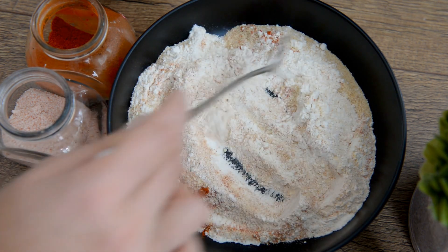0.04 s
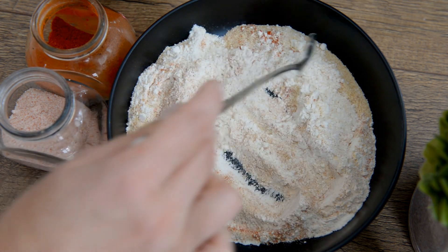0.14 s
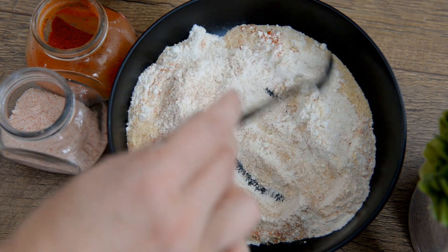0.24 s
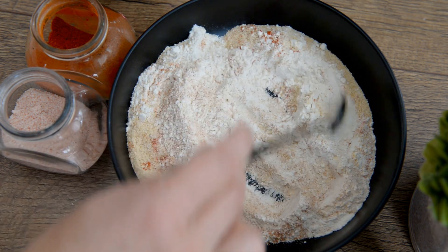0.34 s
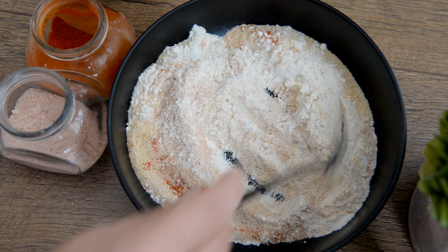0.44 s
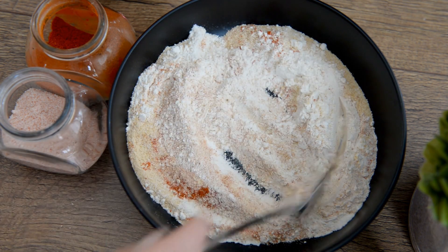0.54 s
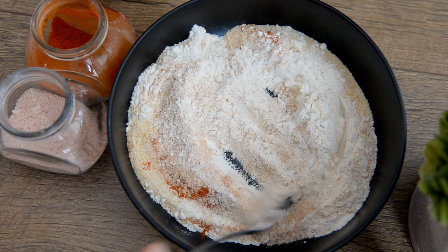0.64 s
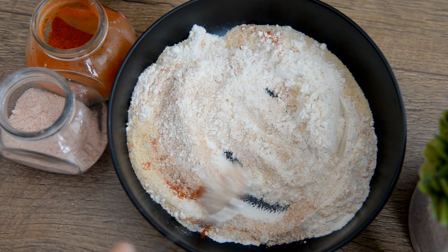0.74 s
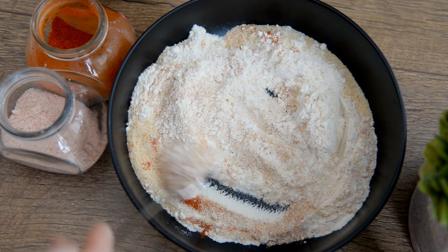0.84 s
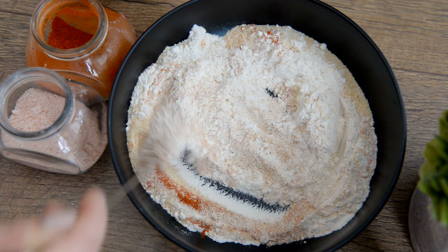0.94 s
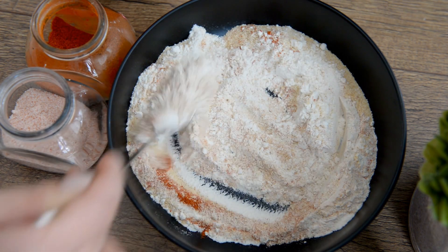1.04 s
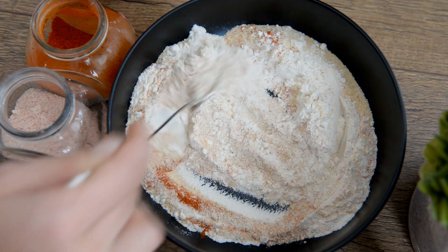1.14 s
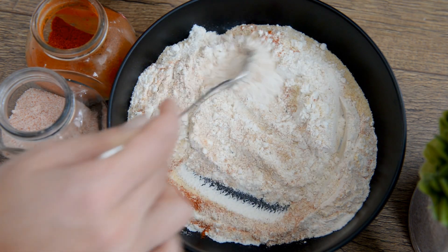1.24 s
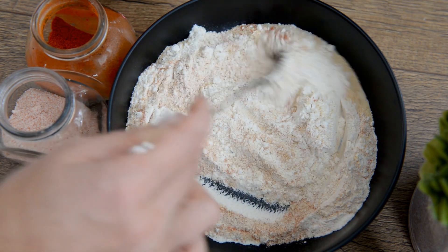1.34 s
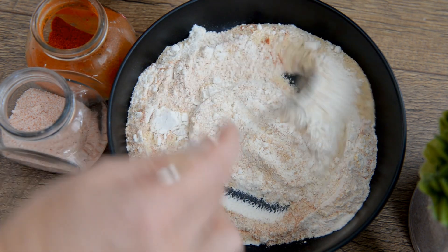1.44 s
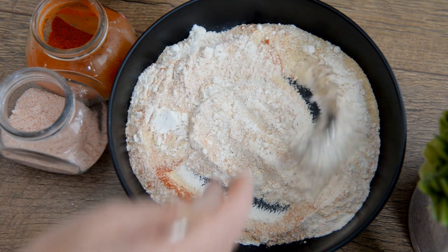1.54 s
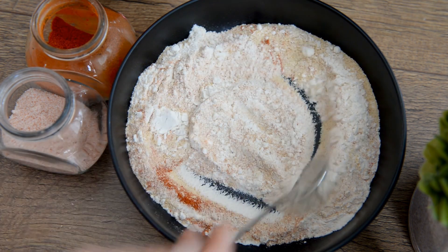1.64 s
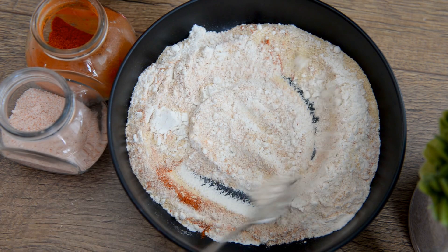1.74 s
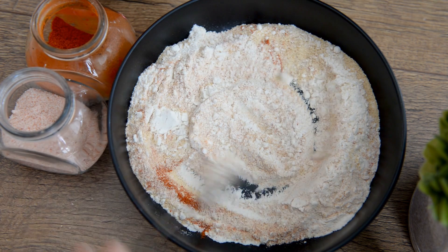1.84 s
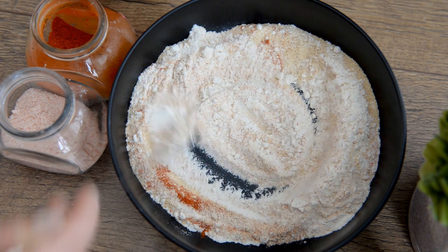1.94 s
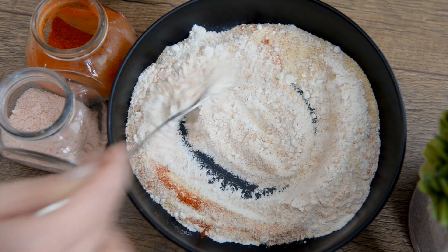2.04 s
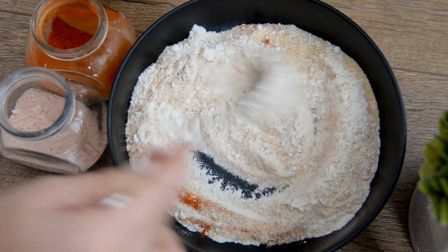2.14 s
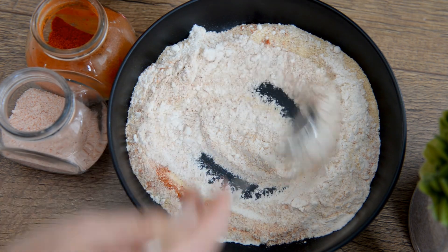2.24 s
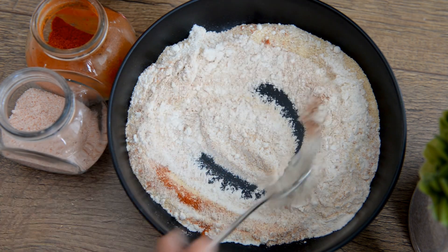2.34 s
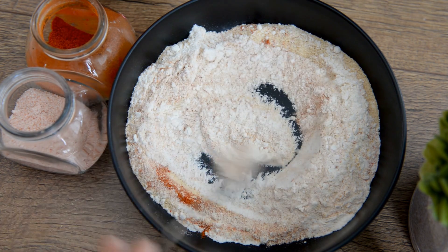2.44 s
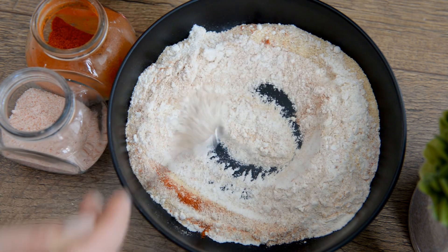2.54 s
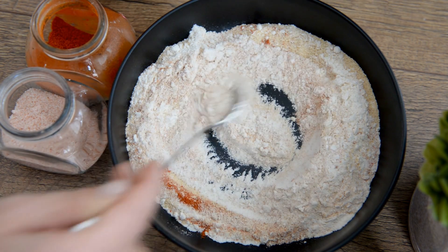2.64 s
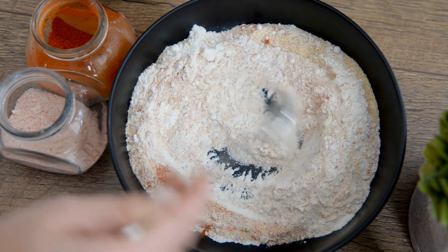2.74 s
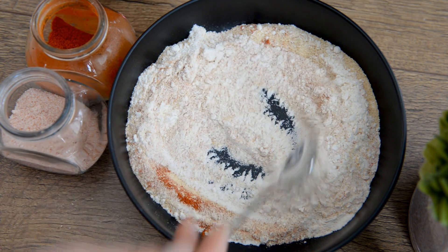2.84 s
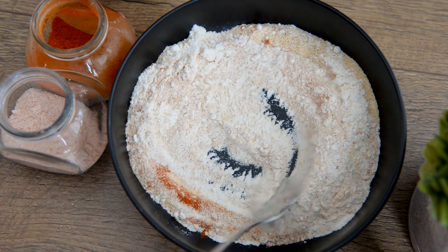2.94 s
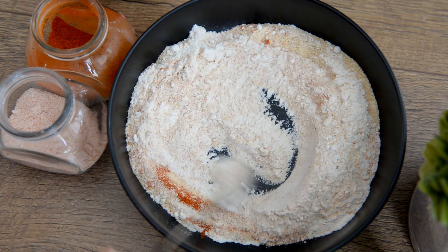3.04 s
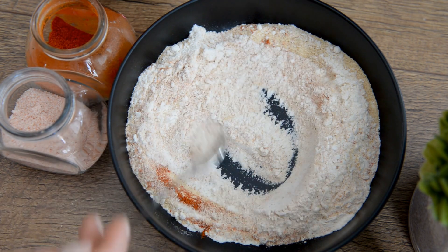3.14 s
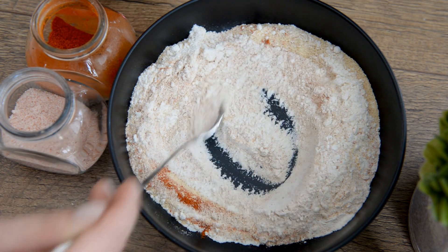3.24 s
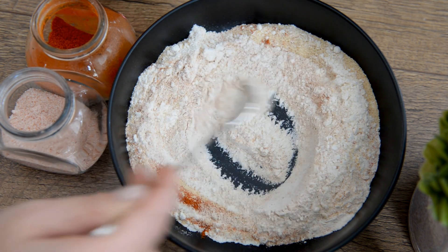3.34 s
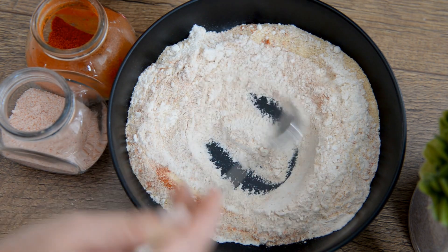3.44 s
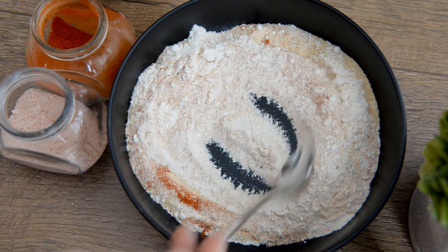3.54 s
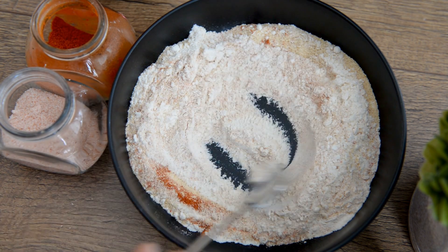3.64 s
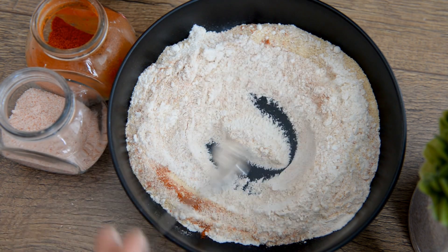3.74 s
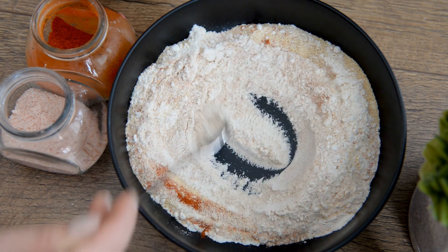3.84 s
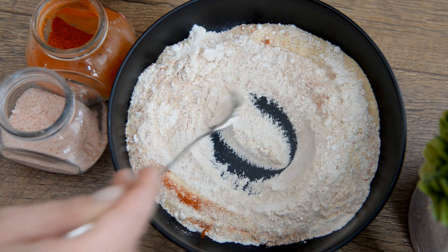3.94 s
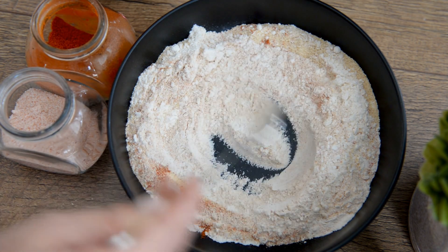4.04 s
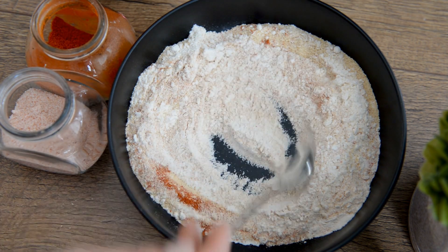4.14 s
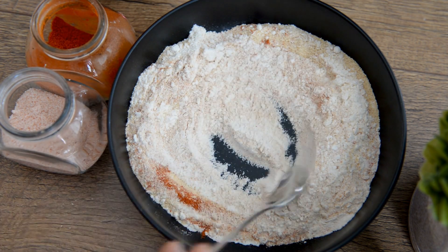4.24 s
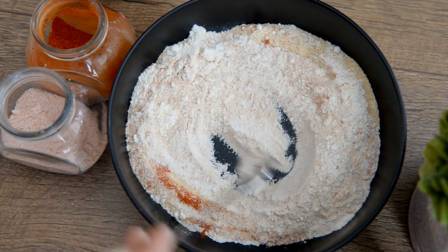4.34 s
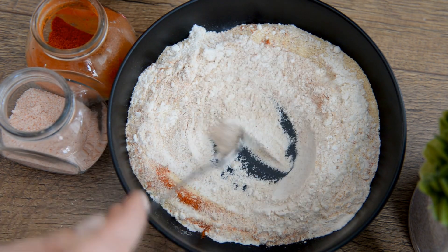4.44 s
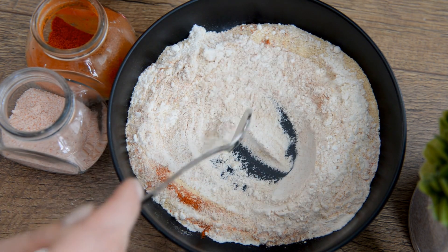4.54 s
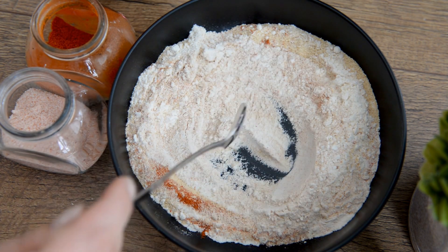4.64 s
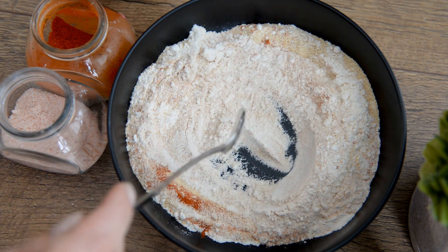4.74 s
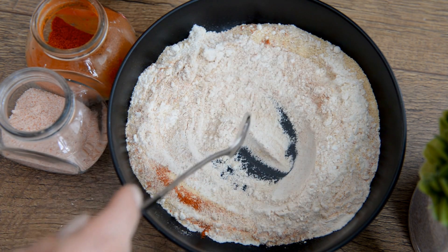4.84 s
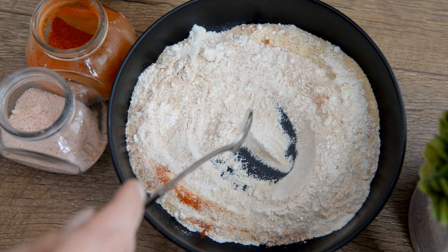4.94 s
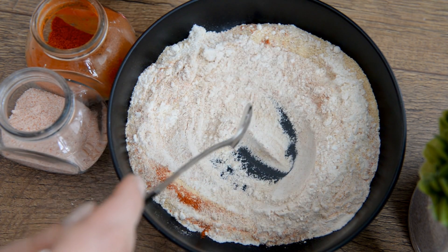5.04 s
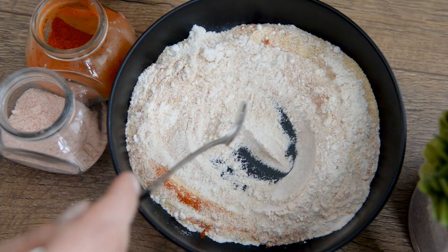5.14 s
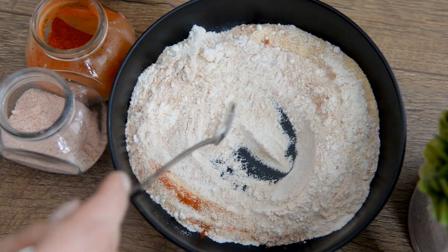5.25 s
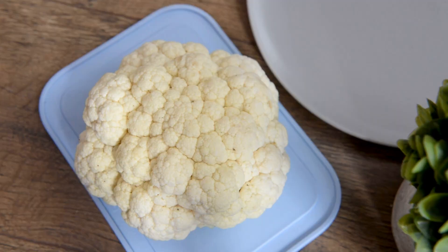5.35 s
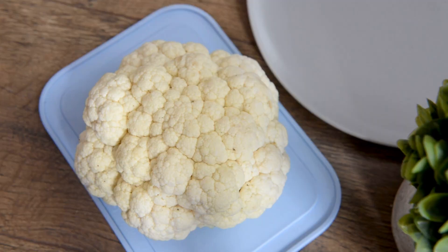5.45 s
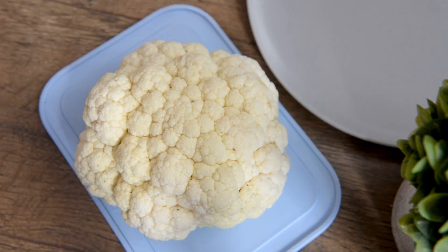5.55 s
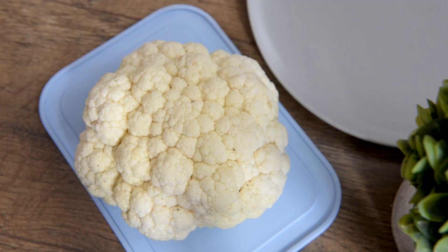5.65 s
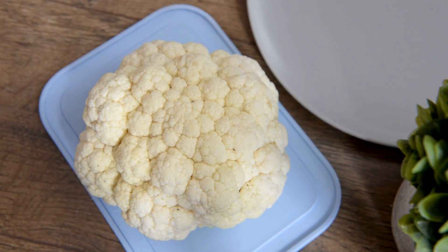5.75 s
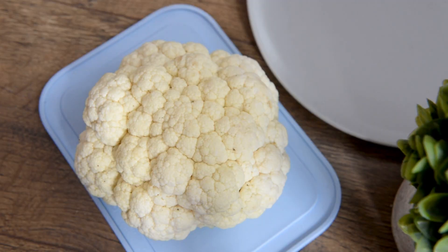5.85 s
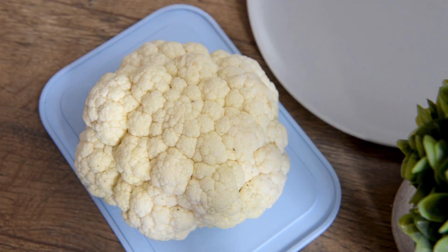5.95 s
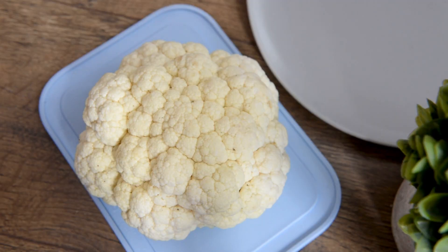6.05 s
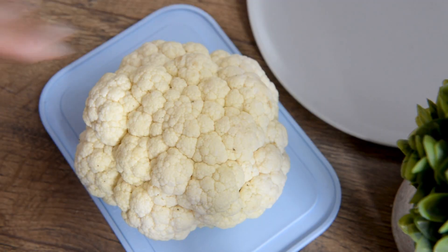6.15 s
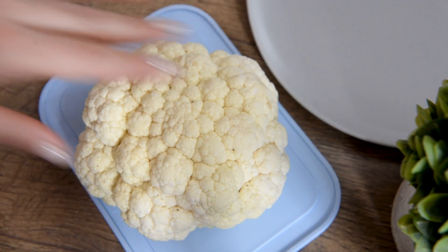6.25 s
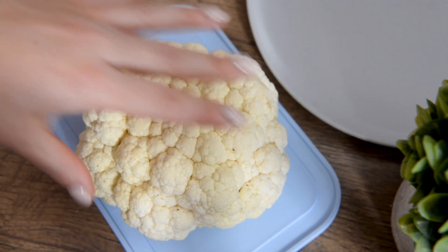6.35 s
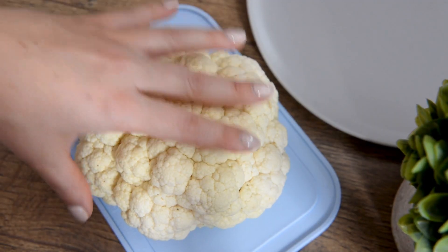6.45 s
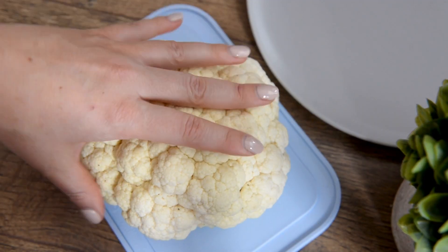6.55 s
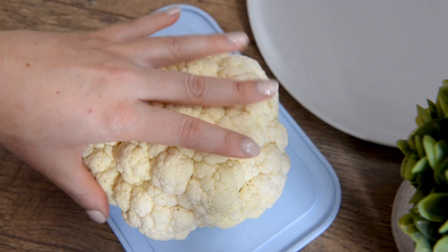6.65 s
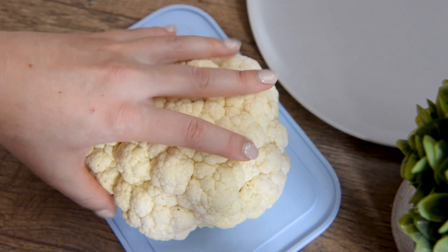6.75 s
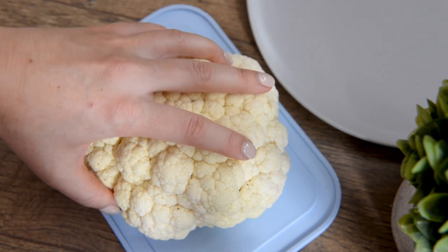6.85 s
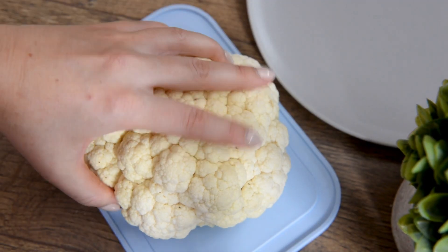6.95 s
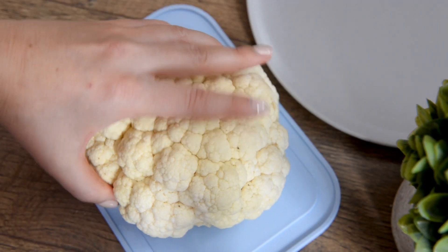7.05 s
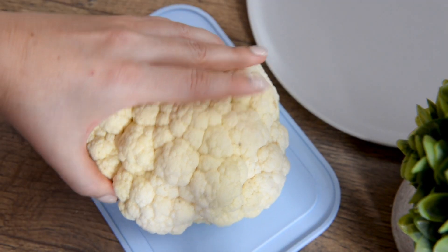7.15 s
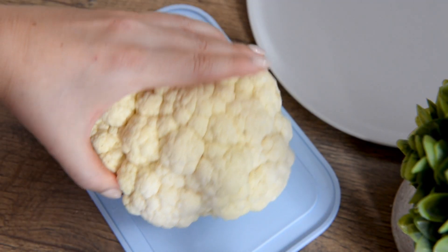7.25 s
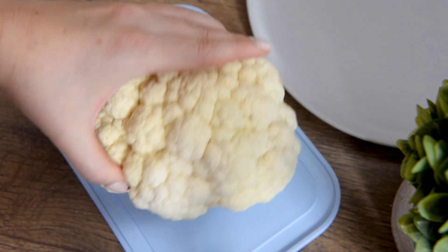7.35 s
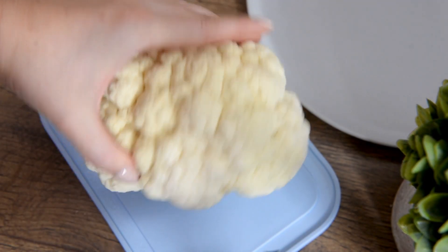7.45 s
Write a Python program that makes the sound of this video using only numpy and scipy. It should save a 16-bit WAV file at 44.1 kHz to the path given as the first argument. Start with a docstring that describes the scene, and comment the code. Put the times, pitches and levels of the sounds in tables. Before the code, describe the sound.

In a quiet kitchen, a fork stirs dry flour and crumbs in a coated metal pan, heard close up. The mix rustles softly while gritty scrapes and taps of the tines make the metal ring lightly. A few small clicks follow, and the sound cuts out with a soft thump. A louder room fades in with a low motor hum, and a hard object knocks on a wooden worktop several times, loud and rattling.

```python
"""In a quiet kitchen a fork is stirred through dry crumbs and flour in a coated metal pan: crushed crumbs
and landing tines ring the metal, more as its floor clears, while the loose mix rustles and sifts.
A few small clicks follow. At 5.4 s the sound cuts out with a soft thump and a louder kitchen fades in,
where a motor hums. From 6.1 s a hard object is knocked down on the wooden worktop, rattling, loud
enough to overload."""
import sys
import numpy as np
from scipy import signal
from scipy.fft import rfft, irfft, next_fast_len
from scipy.io import wavfile
from scipy.ndimage import uniform_filter1d, map_coordinates

SR = 44100
rng = np.random.default_rng(int(sys.argv[2]) if len(sys.argv) > 2 else 0)


def to_wav(sig):
    """Store sig (one row per channel, or 1-D mono) as 16-bit WAV at the path in sys.argv[1].

    Samples outside -1..1 are clipped; the rate is SR.
    """
    pcm = np.clip(np.atleast_2d(sig), -1, 1) * 32767
    pcm = np.round(pcm).astype(np.int16)
    wavfile.write(sys.argv[1], SR, pcm.T)  # frames by channels


N = 330309
TIME_S = np.arange(N) / SR
CUT_S = 5.401


def amp(db):
    return 10 ** (np.asarray(db) / 20)


def unit_rms(x):
    return x / np.sqrt(np.mean(x ** 2) + 1e-20)


def log_interp(points, hz):
    """(Hz, value) points read on a log frequency axis."""
    point_hz, values = np.transpose(points)
    return np.interp(np.log(hz + 1), np.log(point_hz + 1), values)


def curves(rows):
    """One value per sample for each column after the time."""
    times_s, *columns = np.transpose(rows)
    return [np.interp(TIME_S, times_s, column) for column in columns]


def gate(start_s, end_s):
    """1 inside the span, 0 outside, 3 ms edges."""
    return np.clip((TIME_S - start_s) / .003, 0, 1) * np.clip((end_s - TIME_S) / .003, 0, 1)


def wobble(knots_per_s):
    """Smooth random curve."""
    knots = rng.standard_normal(int(N * knots_per_s / SR) + 4)
    return map_coordinates(knots, [TIME_S * knots_per_s])


def filtered(x, response):
    """Applies a gain given as a function of Hz."""
    size = next_fast_len(len(x) + SR // 2)
    return irfft(rfft(x, size) * response(np.fft.rfftfreq(size, 1 / SR)), size)[:len(x)]


def noise(spectrum, size=N):
    """Coloured noise, rms 1."""
    return unit_rms(filtered(rng.standard_normal(size), lambda hz: amp(log_interp(spectrum, hz))))


def resonate(x, modes, wander_db=0.):
    """Mode bank with slowly drifting feeds; near unity gain for white noise."""
    ring, power, knot_position = np.zeros(N), 0, np.linspace(0, 119, N)
    for k, (hz, width_hz, db) in enumerate(modes):
        feed = np.interp(knot_position, np.arange(120), amp(db + wander_db * rng.standard_normal(120)))
        ring += (-1) ** k * signal.lfilter(*signal.iirpeak(hz, hz / width_hz, SR), x * feed)
        power += amp(2 * db) * np.pi * width_hz / SR
    return ring / np.sqrt(power)


# Room tone spectra. Each row: frequency in Hz, relative density in dB.
QUIET_SPECTRUM = [(12, -32), (20, -10.5), (107, -1), (293, -6.5), (377, -3.5), (472, -12), (590, -6),
                  (897, -4), (2600, -19.5), (4060, -19), (4670, -21), (6180, -24.5), (16000, -30.5)]
LOUD_SPECTRUM = [(12, -46), (20, -10), (70, -8), (113, -10), (150, -3), (182, -9.5), (513, -14),
                 (718, -9.5), (1330, -10.5), (3070, -23.5), (4420, -22.5), (6720, -30), (16000, -36)]
# Faint narrow hiss. Each row: centre in Hz, width in Hz, relative level in dB.
HISS_BANDS = [(4570, 280, 4.5), (5530, 450, -7.5)]

def room_tone(fade_wait_s=.08, fade_s=.48, fade_depth_db=43):
    """The quiet room stops dead; the louder one fades in on a round-topped dB ramp."""
    hiss = amp(1.2 * wobble(26)) * resonate(rng.standard_normal(N), HISS_BANDS)
    quiet = amp(-57.5) * (amp(0.23 * wobble(9.2)) * noise(QUIET_SPECTRUM) + amp(-8.5) * hiss)
    loud = amp(-36.5) * (amp(0.53 * wobble(23)) * noise(LOUD_SPECTRUM) + amp(-14.5) * hiss)
    fade_left = np.clip(1 - (TIME_S - CUT_S - fade_wait_s) / fade_s, 0, 1)
    fade_in = amp(-fade_depth_db * fade_left ** 1.2) * gate(CUT_S, 8)
    return quiet * gate(-1, CUT_S) + loud * fade_in


# Kitchen decay. Each row: frequency in Hz, T60 in seconds.
KITCHEN_T60 = [(200, 0.87), (1000, 0.27), (4000, 0.27), (12000, 0.11)]

def reverb(x):
    """The kitchen's tail; each frequency dies at its own rate."""
    hz, t, spectra = signal.stft(rng.standard_normal(SR // 2), SR, nperseg=256)
    decay = amp(-60 * t / log_interp(KITCHEN_T60, hz)[:, None])
    _, tail = signal.istft(spectra * decay, SR, nperseg=256)
    return signal.fftconvolve(np.pad(x, (250, 0)), tail / np.linalg.norm(tail))[:N]


# Motor levels. Each row: time in seconds, hum in dB, half-pitch tone in dB.
MOTOR_LEVELS = [(5.55, -99, -82), (5.836, -43, -48.5), (5.912, -48, -55), (5.992, -37, -45),
                (6.528, -43, -45.5), (6.592, -43, -47), (6.64, -36, -41), (6.862, -63, -54),
                (6.954, -37.5, -52), (7.094, -51, -48), (7.138, -42, -62), (7.44, -53.5, -39),
                (7.49, -39, -37)]

def motor(start_hz=154, sag_hz_per_s=1.5):
    """A wavering, slowly sagging hum and a mostly weaker tone at half its pitch."""
    start_s = MOTOR_LEVELS[0][0]
    hum_db, half_db = curves(MOTOR_LEVELS)
    hz = start_hz - sag_hz_per_s * (TIME_S - start_s) + 0.8 * wobble(10)
    phase = 2 * np.pi * np.cumsum(hz) / SR
    hum = amp(hum_db + 0.8 * wobble(42)) * np.sin(phase)
    half_tone = amp(half_db + 1.8 * wobble(7.9)) * np.sin(phase / 2)
    return np.sqrt(2) * (hum + half_tone) * gate(start_s, 8)


def thump(lead_s=0.0041, decay_s=0.0016):
    """One soft low pulse as the sound cuts out."""
    t = np.clip(TIME_S - CUT_S + lead_s, 0, 1)
    return amp(-36.5) * t / .003 * np.exp(1 - t / decay_s)


# Dry clicks. Each row: start in seconds, relative level in dB, T60 in seconds.
CLICK_EVENTS = [(5.059, -51, 0.036), (5.0725, -48.5, 0.03), (5.204, -42, 0.061), (5.225, -38, 0.024),
                (5.235, -49.5, 0.03), (5.33, -48, 0.09), (5.359, -4, 0.01), (5.3756, -23.5, 0.015)]
# Click spectrum. Each row: frequency in Hz, relative density in dB.
CLICK_SPECTRUM = [(700, -29), (2200, -22), (3200, -0.5), (4700, 3), (6300, -14.5), (7500, -38.5),
                  (15000, -39)]

def clicks(rise_s=0.00029):
    """Short bright noise bursts, no ring."""
    bursts, t = np.zeros(N), np.arange(SR // 10) / SR
    for start_s, db, t60_s in CLICK_EVENTS:
        envelope = amp(db - 2 - 60 * t / t60_s) * (1 - np.exp(-t / rise_s))
        bursts[round(start_s * SR):][:len(t)] += envelope * noise(CLICK_SPECTRUM, size=len(t))
    return bursts


# Worktop knocks. Each row: start in seconds, wood and rattle in relative dB, struck spot's pitch in Hz.
KNOCK_EVENTS = [(6.071, -3, -12.5, 765), (6.087, -4, -10.5, 630), (6.0994, 16, -21, 704),
                (6.103, 0, -28, 670), (6.115, 1, -41.5, 810), (6.157, 7, 5.5, 885), (6.177, 5.5, -4, 910),
                (6.199, -1.5, -23, 553), (6.305, 6, -3.5, 800), (6.317, 3, -2, 700), (6.409, -17, -25, 681),
                (6.497, -7, -20.5, 870), (6.506, -5.5, -16.5, 865), (6.564, -10, -22, 790),
                (7.428, -27, -18.5, 1150)]
# Worktop and object modes. Each row: frequency in Hz, width in Hz, relative level in dB.
WOOD_MODES = [(248.4, 60, -2.5), (355, 80, 0), (564, 140, -5.5), (644, 80, -1), (677, 84, 1), (819, 67, -5),
              (907, 80, -0.5), (993, 100, 0), (1260, 170, -1.5), (1610, 360, -13)]
RATTLE_MODES = [(1912, 180, -3.5), (2463, 150, -3.5), (2715, 120, -4), (3680, 450, -10), (4260, 326, -4.5),
                (4410, 110, 1.5), (4780, 180, -1.5), (5380, 280, -4.5), (5616, 195, -3), (6710, 320, -14),
                (8000, 230, -19.5), (9270, 680, -29)]

def knocks(crunch_t60_s=0.028):
    """Each knock is a short push into the worktop and a brief crunch into the loose object on it."""
    push, crunch, t = np.zeros(N), np.zeros(N), np.arange(SR // 20) / SR
    for start_s, wood_db, rattle_db, hz in KNOCK_EVENTS:
        onset = round(start_s * SR)
        # the struck spot favours modes near its own pitch
        spot = hz / SR * np.cos(2 * np.pi * hz * t) * np.exp(-.9 * hz * t)
        push[onset:][:len(t)] += amp(wood_db + 21.5) * spot
        envelope = amp(rattle_db - 4 - 60 * t / crunch_t60_s)
        crunch[onset:][:len(t)] += envelope * rng.standard_normal(len(t))
        crunch[onset] += amp(rattle_db + 8.5)
    return resonate(push, WOOD_MODES) + resonate(crunch, RATTLE_MODES, wander_db=1.5)


# Loose mix levels. Each row: time in seconds, rustle in dB, sifting in dB.
MIX_LEVELS = [(0.0, -64, -80), (0.35, -58, -68), (0.7, -54.5, -54), (1.3, -53.5, -51), (2.05, -55, -48.5),
              (2.85, -66, -58), (4.1, -64.5, -54.5), (4.7, -84, -68.5)]
# Sliding mix spectra. Each row: frequency in Hz, relative density in dB.
DULL_SPECTRUM = [(120, -9.5), (250, -8.5), (450, -6), (700, -43.5)]
RUSTLE_SPECTRUM = [(350, -15), (700, -2), (1100, 3.5), (1700, -5.5), (2600, -40.5)]
# Damped fork modes. Each row: frequency in Hz, width in Hz, relative level in dB.
DAMPED_FORK_MODES = [(970, 520, -10), (2170, 200, 2.5), (3540, 970, -4), (4290, 420, -0.5),
                     (5900, 370, -3.5), (6900, 110, -6.5), (8430, 580, -17.5)]

def loose_mix(floor_pressure, lead_s=0.025, slump_s=0.634, slump_width_s=0.16):
    """The mix slides, shoved ahead of each stroke, slumps once and sifts between the tines."""
    rustle_db, sift_db = curves(MIX_LEVELS)
    ahead = np.roll(abs(uniform_filter1d(floor_pressure, SR // 12)), -round(lead_s * SR))
    shove = amp(-56.5) * (ahead / amp(-25)) ** 0.34
    slump = amp(-55.5) * np.exp(-((TIME_S - slump_s) / slump_width_s) ** 2)
    dull = (slump + amp(-7) * shove) * amp(2.5 * wobble(30)) * noise(DULL_SPECTRUM)
    rustle = (amp(rustle_db) + shove) * amp(2.4 * wobble(43)) * noise(RUSTLE_SPECTRUM)
    sift = amp(sift_db + 2 * wobble(40)) * rng.standard_normal(N)
    return (dull + rustle + resonate(sift, DAMPED_FORK_MODES)) * gate(-1, MIX_LEVELS[-1][0])


# Fork strokes. Each row: start, rise and fall in seconds; touch-down, peak and lift-off drive in dB;
# shoulder, wall, tines and rim in dB over the pan floor.
FORK_STROKES = [(0.5, 0.31, 0.049, -72.5, -52.5, -57, -7, 2, -6, -22),
                (1.064, 0.017, 0.072, -36.5, -37, -44, -1.5, -10.5, -16, -56),
                (1.16, 0.082, 0.027, -50.5, -44.5, -51, 7.5, 7.5, -5.5, -18.5),
                (1.407, .08, 0.031, -43, -35.5, -57, 2, 4, 0, -22.5),
                (1.607, 0.015, 0.096, -40, -35, -37, -17, 6.5, -7, -31),
                (1.779, 0.018, 0.029, -39, -43, -36.5, -9.5, 9, -4.5, -19),
                (1.836, 0.042, 0.16, -51, -47.5, -43, -9, 2, -3.5, -21),
                (2.09, 0.14, 0.14, -36.5, -25, -37, -2.5, 6.5, -4, -12.5),
                (2.387, 0.11, 0.044, -43, -29, -38.5, -7, 7, -2.5, -11.5),
                (2.56, 0.029, .12, -32.5, -43, -49, 0, -1.5, -5, -28),
                (2.724, 0.034, 0.037, -41.5, -38, -57.5, -7.5, 9, -2, -16),
                (2.908, 0.034, 0.042, -40.5, -27.5, -43.5, -11, -1, -11.5, -27),
                (2.997, 0.077, 0.17, -35.5, -27, -51.5, -9.5, 4.5, -5.5, -15.5),
                (3.34, 0.0092, 0.12, -44, -54, -48, -1, 3, -2, -23),
                (3.444, 0.022, 0.14, -39.5, -31.5, -52, -8, 4.5, -7, -15.5),
                (3.599, 0.14, 0.13, -49.5, -27.5, -46, -12.5, 4, -4.5, -19),
                (4.174, 0.003, 0.027, -19, -34, -55, -8, 3.5, -1, -14),
                (4.275, 0.1, 0.13, -49.5, -26.5, -57.5, -9.5, 1.5, -9.5, -25.5)]
# Loss over a stroke in dB, one per mode group: belly, floor, shoulder, wall, tines, rim.
STROKE_LOSS_DB = [6, -4, 5.5, 5.5, 3.5, -4.5]

def fork_pressure(belly_db=-3.5, roundness=1.21, lift_t60_s=0.02):
    """Pressure on the six mode groups: touch down at once, swell, fall, lift off."""
    pressure = np.zeros((len(STROKE_LOSS_DB), N))
    for start_s, rise_s, fall_s, touch_db, peak_db, lift_db, *upper_db in FORK_STROKES:
        contact_s = rise_s + fall_s
        t = np.arange(round((contact_s + lift_t60_s) * SR)) / SR
        rise_left = np.clip(1 - t / rise_s, 0, 1) ** roundness
        fallen = np.clip((t - rise_s) / fall_s, 0, 1) ** roundness
        db = peak_db + (touch_db - peak_db) * rise_left + (lift_db - peak_db) * fallen
        db -= 60 * np.clip(t - contact_s, 0, 1) / lift_t60_s
        past_middle = (t / contact_s - .5).clip(max=.5)
        colour_db = np.c_[[belly_db, 0, *upper_db]] - np.c_[STROKE_LOSS_DB] * past_middle
        pressure[:, round(start_s * SR):][:, :len(t)] += amp(db + colour_db)
    return pressure


# Pan and fork modes. Each row: frequency in Hz, width in Hz, relative level in dB.
BELLY_MODES = [(928, 120, -10.5), (1388, 360, 0)]
FLOOR_MODES = [(2010, 540, -3), (2066, 250, -5), (2224, 184, -2)]
SHOULDER_MODES = [(2827, 60, -3.6), (3117, 280, 1), (3190, 750, 1)]
WALL_MODES = [(3730, 66, 0.5), (3805, 84, 4), (3855, 59, 2.5), (4260, 260, -8.5), (4100, 23, -14),
              (4425, 340, -11), (5020, 220, -14)]
TINE_MODES = [(5290, 53, -5.5), (5857, 170, 1), (6724, 140, -3.5)]
RIM_MODES = [(7506, 35, -4), (8010, 64, -12.5), (8660, 104, -12.5), (9700, 300, -26), (9830, 83, -22.5),
             (12100, 72, -42), (12360, 150, -45), (12730, 160, -43), (14000, 520, -44), (14900, 180, -31)]
BARE_METAL_MODES = [(2194, 67, -4), (2227, 16, 5.5), (2294, 100, -6.5), (3900, 11, -13), (3903, 29, -4)]
# Tines landing on the pan. Each row: time in seconds, relative level in dB, extra wall feed in dB.
LANDINGS = [(1.07, -33, -16), (1.6124, -24.5, -7), (1.7784, -27, 7), (2.0113, -24, -4),
            (2.0722, -27.5, -3.5), (2.5616, -32, -2), (2.6199, -36, -4), (2.7484, -26.5, 5.5),
            (2.9073, -24, -1), (3.4431, -21, 2), (4.1744, -21.5, 9.5)]
# A landing's relative feed in dB, one per mode group, belly to rim.
LANDING_FEED_DB = [-19, -9, 2, -2.5, -5.5, -26]
BELLY, FLOOR, WALL = 0, 1, 3  # group indices

def stirring(pressure, covered_db=-31, cleared_db=-0.5, clearing_s=3.6):
    """Crushed crumbs ring pan and tines with dense tiny blows; a landing is one big blow."""
    crumbs = unit_rms(rng.standard_normal(N) * amp(1.6 * rng.exponential(size=N) + 1.8 * wobble(300)))
    drives = crumbs * pressure
    # as the floor clears, bare metal rings more and the belly thins
    clearing_db = (cleared_db - covered_db) * np.clip(TIME_S / clearing_s, 0, 1)
    drives[BELLY] *= amp(-0.36 * clearing_db)
    for start_s, db, wall_db in LANDINGS:
        blow_db = db + 14 + np.array(LANDING_FEED_DB)
        blow_db[WALL] += wall_db
        drives[:, round(start_s * SR)] += amp(blow_db)
    # the contact point wanders, so modes are fed unevenly
    groups = [BELLY_MODES, FLOOR_MODES, SHOULDER_MODES, WALL_MODES, TINE_MODES, RIM_MODES]
    *main, rim = [resonate(drive, modes, wander_db=3.5) for drive, modes in zip(drives, groups)]
    flour_cushion = signal.butter(2, [700, 8500], 'band', fs=SR, output='sos')
    bare_ring = resonate(drives[FLOOR] * amp(covered_db + clearing_db), BARE_METAL_MODES, wander_db=1)
    return signal.sosfilt(flour_cushion, sum(main)) + rim + bare_ring


def scene():
    """Stirring and clicks up to the cut, then motor and knocks; mono."""
    pressure = fork_pressure()
    pan, ticks, worktop = stirring(pressure), clicks(), knocks()
    reflections = reverb(amp(-11) * pan + amp(-27.5) * ticks)
    before_cut = (pan + ticks + reflections + loose_mix(pressure[FLOOR])) * gate(-1, CUT_S)
    after_cut = worktop + amp(-10.5) * reverb(worktop) + motor()
    return (before_cut + thump() + after_cut + room_tone())[None]


def record(dry, top_hz=15900):
    """Saturation at full scale, then a brick-wall low-pass."""
    saturated = dry[0] / (1 + abs(dry[0]) ** 8) ** (1 / 8)
    return filtered(saturated, lambda hz: hz < top_hz)[None]


dry = scene()
out = record(dry)
to_wav(out)
```